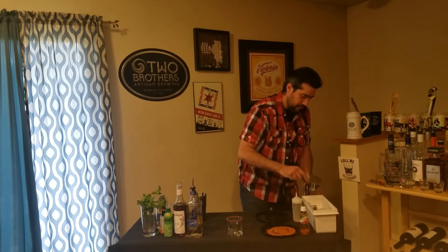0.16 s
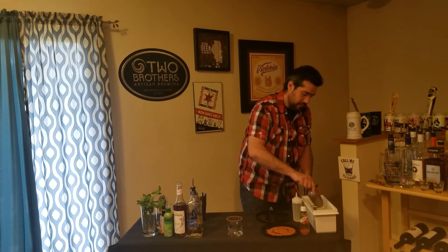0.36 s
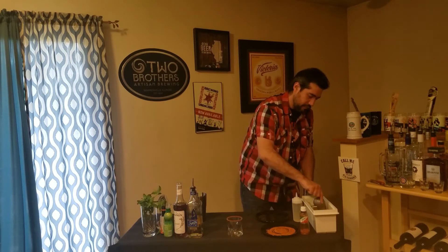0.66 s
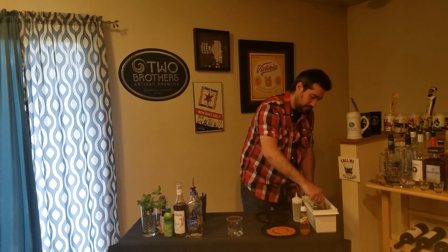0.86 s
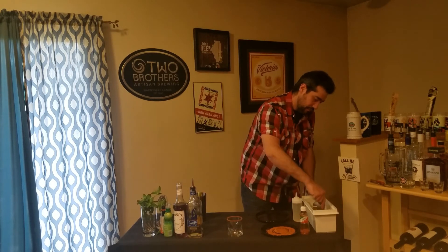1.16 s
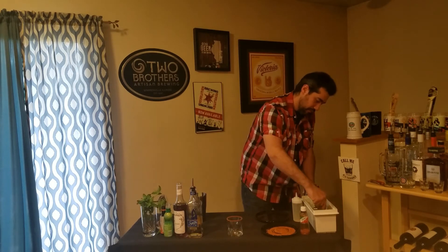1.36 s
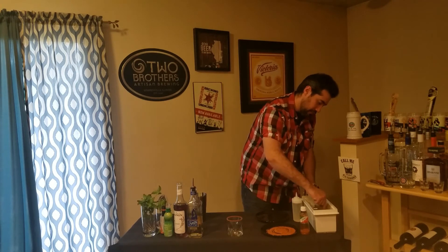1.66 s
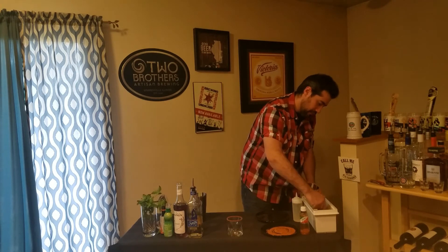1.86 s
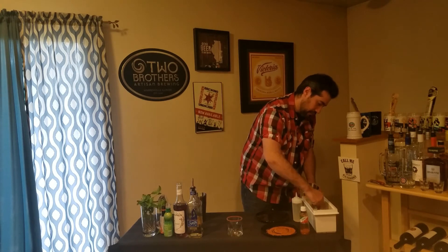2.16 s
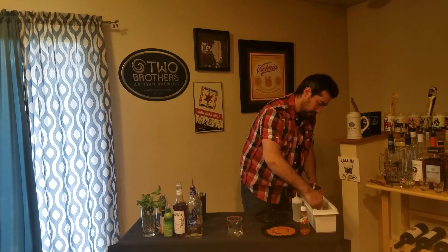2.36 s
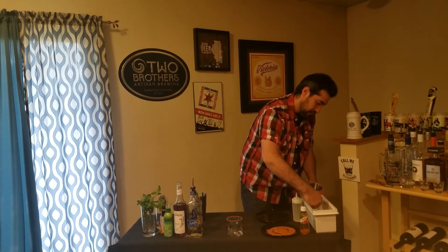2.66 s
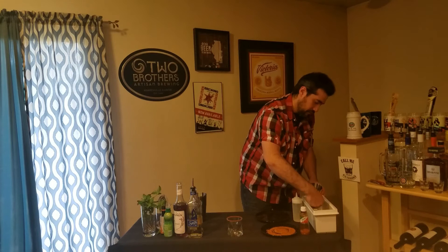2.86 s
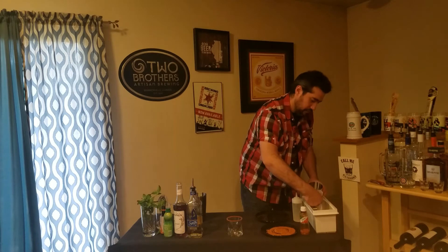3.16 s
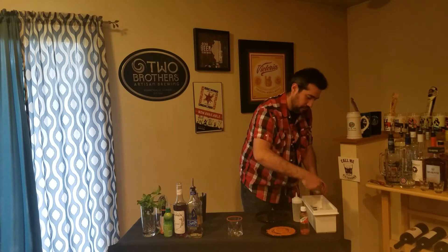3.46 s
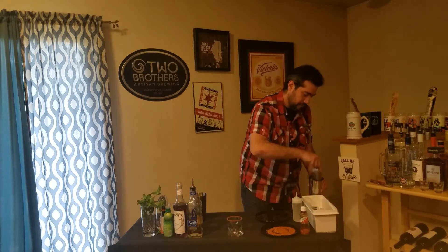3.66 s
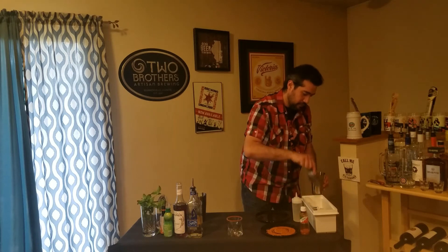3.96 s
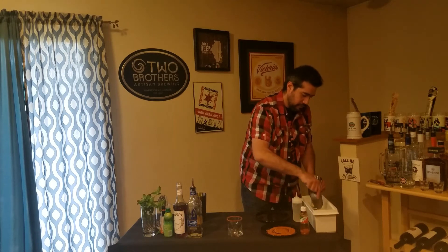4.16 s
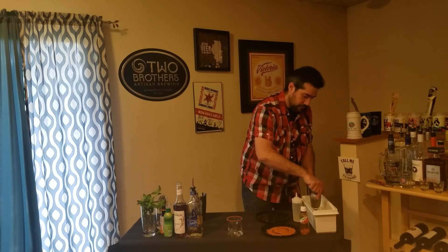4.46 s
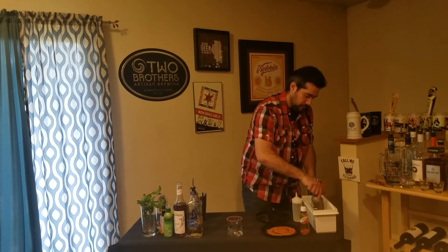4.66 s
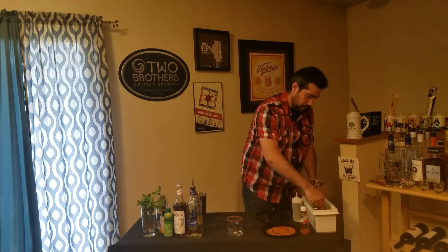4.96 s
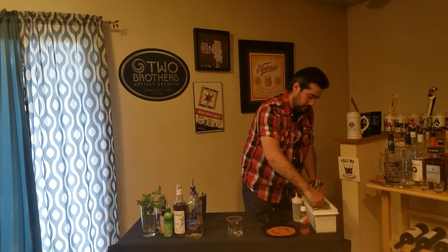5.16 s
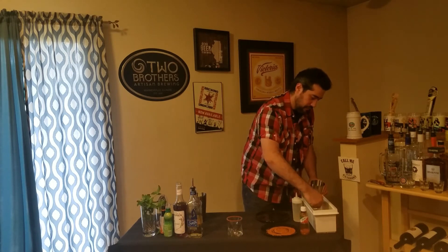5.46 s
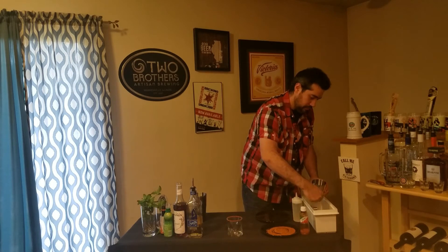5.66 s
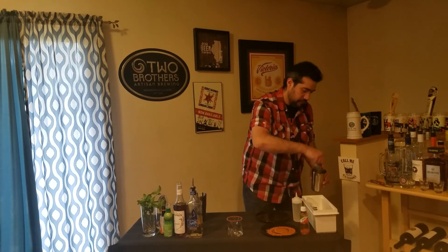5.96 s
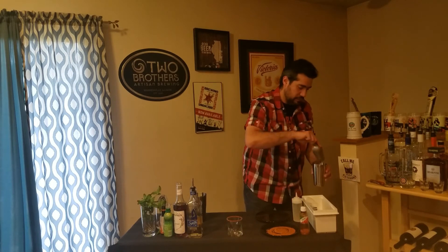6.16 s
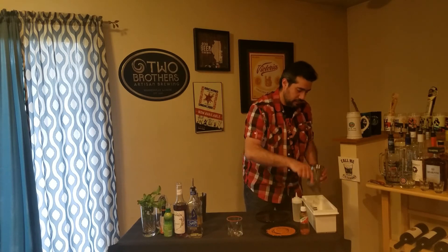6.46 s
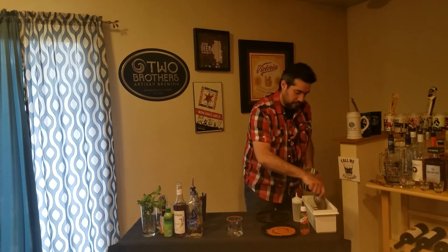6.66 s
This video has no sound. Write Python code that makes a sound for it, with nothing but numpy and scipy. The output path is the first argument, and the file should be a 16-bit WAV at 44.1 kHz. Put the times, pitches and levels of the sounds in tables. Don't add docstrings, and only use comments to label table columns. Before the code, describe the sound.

A quiet fridge hum and soft air run throughout in a small furnished room, heard in stereo from a few metres away. Right at the start an ice cube lands in a steel shaker tin with a bright hollow pop, two quick bounces and a brief ring. From 0.4 to 1.7 seconds tongs dig hard into a plastic bin of ice: dense cracking knocks, low hollow wall thumps and frosty rattle, with strong steel clinks around 1.4. Until 2.3 the cubes keep knocking, then the search thins to faint touches, with a firmer burst near 3.3. At 3.7 a cube drops loudly into the tin, popping, bouncing faintly and ringing. Separate picks and light clinks follow from 4.2 to 5.6, with touches on the tin around 5.5 and 5.9. A softer, duller drop comes at 6.1, and a few knocks and a small clink from 6.55 to 6.8 end it.

```python
import sys
import numpy as np
from scipy import signal
from scipy.fft import rfft, irfft
from scipy.io import wavfile
from scipy.ndimage import uniform_filter1d

SR = 44100
rng = np.random.default_rng(int(sys.argv[2]) if len(sys.argv) > 2 else 0)


def generate_wav(signal):
    frames = np.transpose(np.atleast_2d(signal))
    scaled = np.clip(frames, -1, 1) * 32767
    pcm = np.round(scaled).astype(np.int16)
    wavfile.write(sys.argv[1], SR, pcm)


def field_ratio(decibels):
    return 10 ** (np.asarray(decibels, dtype=float) / 20)


N = 300747

# frequency in Hz, density in dB per Hz.
AIR_SPECTRUM = [(15, 5), (25, -6), (65, -1), (111, 4), (220, 3.5), (422, -3.5), (470, -10.5), (651, -7),
                (706, -6), (952, -10.5), (4020, -18.5), (7710, -27), (8600, -35), (14400, -25.5),
                (16500, -46)]
# frequency in Hz, rms level in dB.
HUM_TONES = [(59.2, -59.5), (118.4, -67.5), (156.1, -59.5), (215.3, -63.5), (236.9, -68.5), (296.1, -66),
             (355.3, -74.5), (414.5, -64.5), (532.9, -76), (710.6, -64), (829.0, -63), (1486, -71),
             (1900, -75.5), (2078, -72), (2611, -79), (3505, -78), (3919, -76), (4651, -76), (6234, -85),
             (14174, -94)]
# frequency in Hz, likeness from 0 to 1.
LIKENESS = [(60, .7), (250, .8), (700, 0.6), (1500, 0.096), (4000, 0.022), (15000, 0.02)]

# start in seconds, blow in dB, wall note in Hz, rim note in Hz, ring in dB.
WALL_CLINKS = [(.008, -29.5, 4700, 13000, -10), (0.031, -19, 6850, 13100, -21),
               (1.359, -8.5, 7120, 12700, 0), (1.446, -13, 7120, 13000, 1), (1.513, -14.5, 6430, 15600, 6),
               (1.556, -46, 6500, 15300, -5), (3.634, -30.5, 6100, 13000, 4),
               (3.663, -24, 6500, 11000, -16), (3.692, -25, 3800, 13200, -5),
               (3.737, -18, 3800, 14200, -18), (4.158, -29.5, 6750, 11870, 2),
               (4.462, -16, 6380, 13000, 1.5), (4.466, -39, 5200, 3870, -12), (5.025, -35, 6150, 12200, -9),
               (5.09, -20, 6230, 12600, 1.5), (5.185, -18.5, 6200, 14700, -14),
               (5.544, -26.5, 6320, 15300, -6), (5.911, -46, 6320, 13700, 9), (5.944, -25, 6030, 13700, -4),
               (6.051, -37.5, 3730, 13300, 0), (6.086, -17.5, 3850, 13800, -2),
               (6.68, -23.5, 7260, 12300, -0.5)]
# start in seconds, blow in dB, hollow note in Hz, upper note in Hz.
BOTTOM_DROPS = [
    (.033, -11.5, 1770, 2300),
    (.052, -16, 1795, 2180),
    (.072, -18.5, 1775, 2050),
    (3.738, -11, 1700, 2860),
    (3.774, -27, 1720, 2730),
    (3.801, -25, 1725, 2780),
    (5.546, -32.5, 2050, 2540),
    (5.944, -34, 2224, 2800),
    (6.088, -18, 1880, 2400),
]
# start in seconds, level in dB, frequency in Hz, t60 in seconds.
TIN_NOTES = [(.033, -25, 1792, .2), (.05, -23, 1781, .36), (.034, -30, 720, .06), (.141, -54, 3920, .25),
             (.106, -29, 1830, .14), (.033, -25, 3035, .075), (.035, -28, 1508, .1), (.035, -29, 2330, .12),
             (3.632, -32, 6230, .23), (3.662, -33, 6200, .19), (3.634, -39, 2450, .13),
             (3.638, -43, 1282, .39), (3.64, -42, 3870, .5), (3.69, -44, 3870, .4), (3.738, -34, 1736, .24),
             (3.738, -30, 2778, .22), (3.738, -35, 3020, .17), (3.737, -48, 3790, .5),
             (4.47, -36, 5200, .12), (4.462, -43, 3890, .3), (4.463, -45, 6325, .45),
             (4.463, -37, 7100, .25), (1.446, -23, 7120, .15), (6.088, -46, 3890, .27),
             (6.087, -27, 1180, .14), (3.735, -19, 2900, .06), (3.738, -29, 2934, .19),
             (3.738, -31, 2670, .17), (4.463, -46, 3128, .2), (5.398, -49, 6150, .3),
             (5.436, -44, 7230, .17), (5.436, -46, 5238, .17), (5.547, -44, 6320, .25),
             (5.912, -48, 6250, .3), (5.945, -46, 3900, .22), (6.088, -33, 2110, .18),
             (6.088, -35, 2326, .17), (6.088, -37, 3919, .14), (6.088, -40, 4242, .17),
             (6.088, -48, 5916, .25)]
# frequency in Hz, level in dB, t60 in seconds.
TIN_MODES = [(2440, -40, 0.14), (3800, 6, 0.22), (5200, -19, 0.11), (5060, -32, 0.078), (6000, -29, 0.19),
             (6320, 8, 0.27), (7120, -47, 0.18), (7800, -32, 0.051)]

# start in seconds,
# blow in dB, sharpness in dB, wall patch in Hz.
ICE_KNOCKS = [(.412, -11, -9.5, 804), (.470, -20, -7.5, 796), (.503, -17.5, -8, 700),
              (.548, -19.5, 0, 630), (.566, -11, -7, 650), (.607, -13, -4.5, 1040),
              (.615, -1.5, -11.5, 1115), (.632, -11.5, -16, 810), (.643, -12, -17, 710),
              (.665, -5.5, -9, 816), (.68, -18.5, -17, 800), (.773, -18.5, -20, 920),
              (.899, -23.5, -37, 820), (.953, -27.5, -18, 665), (.983, -24, -17, 890),
              (1.012, -15.5, -9, 523), (1.08, -22, 0.5, 875), (1.138, -15.5, -12, 710),
              (1.174, -10, -13.5, 663), (1.197, -13, -12.5, 740), (1.251, -28, -31, 690),
              (1.29, -13, -18, 1150), (1.33, -19, -17, 690), (1.362, -13.5, -4.5, 1080),
              (1.368, -17, 0.5, 820), (1.394, -6.5, -14.5, 770), (1.405, -7, -18, 810),
              (1.425, -16, -3.5, 634), (1.462, -9.5, -7, 970), (1.485, -3, -19, 726),
              (1.515, -15.5, -1.5, 790), (1.541, -12.5, -19, 597), (1.563, -10.5, -16, 644),
              (1.582, -19, -9, 630), (1.655, -25.5, -11, 840), (1.673, -24, -10, 830),
              (1.709, -18, -20, 920), (1.738, -25.5, -10.5, 810),
              (1.818, -18.5, -14.5, 557), (1.88, -21, -17, 600), (1.894, -14.5, -17, 846),
                (1.921, -12.5, -18, 570), (1.938, -11, -14, 690), (2.019, -5.5, -18.5, 684),
                (2.036, -11, -17, 615), (2.06, -8.5, -11, 920), (2.077, -21, -18, 810),
                (2.118, -12.5, -14.5, 920), (2.138, -6.5, -15.5, 856), (2.163, -15, -18, 920),
                (2.183, -25, -7.5, 780), (2.216, -19, -15, 570), (2.248, -22.5, -16, 705),
                (2.291, -28.5, -10, 866), (2.317, -15.5, -22, 696), (2.346, -36, -22, 780),
                (2.424, -28, -26, 570), (2.533, -34, -17, 890), (2.671, -32.5, -15, 556),
                (2.725, -34.5, -15, 540), (2.818, -33.5, -13.5, 806), (2.84, -31, -12, 1110),
                (2.879, -17.5, -19.5, 548), (2.985, -32.5, -27, 527), (3.052, -17.5, -6, 643),
                (3.145, -29, -9, 633), (3.203, -29, -17, 860), (3.269, -11, -12, 910),
                (3.302, -10.5, -14, 950), (3.326, -15.5, -4.5, 980), (3.346, -8, -26, 853),
                (3.36, -23.5, -17, 860), (3.388, -29, -7, 860), (3.631, -43.5, 2.5, 1180),
                (3.666, -35.5, -7, 1250), (3.691, -29.5, -5.5, 930), (3.739, -32, 7, 1550),
              (4.162, -23, -10, 1030), (4.186, -17.5, -9.5, 807), (4.212, -22, -13, 730),
               (4.402, -25.5, -27, 680), (4.408, -15.5, -15.5, 667), (4.443, -38, -25, 850),
               (4.464, -21.5, -12, 556), (4.694, -13.5, -11, 708), (4.713, -10.5, -14.5, 613),
               (4.733, -27, -18, 675), (4.752, -22, -10, 755), (5.031, -28.5, -11, 740),
               (5.049, -16, -7, 755), (5.079, -7.5, -15, 595), (5.185, -11, -9.5, 660),
               (5.222, -16, -25, 600), (5.266, -13.5, -21, 670), (5.316, -34, -8, 820),
               (5.357, -13.5, -11, 670), (5.398, -27.5, 0.5, 645), (5.436, -25, -12, 810),
               (5.461, -21.5, -13, 574), (5.547, -34, -3, 880), (5.913, -40, -2.5, 1120),
               (5.943, -39.5, -3.5, 704), (6.05, -33.5, -5.5, 1400), (6.086, -29, 2, 1090),
               (6.554, -21, -11.5, 766), (6.558, -12, -12, 624), (6.63, -38, -3, 630),
               (6.685, -15.5, -13.5, 910), (6.702, -16, -8, 645), (6.783, -28.5, -5.5, 730)]
# start, strongest point and end in seconds, effort in dB.
TONG_STROKES = [(0.41, 0.632, 0.57, -18.5), (0.83, 1.167, 1.31, -27), (1.238, 1.472, 1.48, -16.5),
                (1.846, 2.11, 2.2, -23), (2.3, 2.437, 2.58, -40.5), (2.935, 3.127, 2.85, -29),
                (3.265, 3.336, 3.48, -31.5), (3.55, 3.7, 9.1, -51.5), (4.15, 4.21, 4.25, -36),
                (4.67, 4.836, 4.9, -47), (5.107, 5.272, 5.33, -39), (5.357, 5.437, 5.6, -44),
                (5.996, 6.111, 12, -63.5), (6.538, 6.604, 5.5, -42), (6.67, 6.724, 5.8, -42)]
# time in seconds, level in dB.
FLOOR_WEIGHT = [(0, -6), (.45, 1), (.7, -12.5), (1.1, 1.5), (1.45, -10.5), (1.8, -5.5), (2.05, -10),
                (2.3, -12), (2.9, -4), (3.1, 5), (3.35, -10.5), (4.2, -0.5), (4.45, -9), (4.75, -6),
                (5.1, -3.5), (5.4, -8.5), (6.1, -4), (6.7, -1.5)]
# frequency in Hz, level in dB, t60 in seconds.
BIN_MODES = [(555.4, -3.5, 0.097), (645.5, 0.5, 0.076), (748, -6, 0.067), (780, -4.5, 0.079),
             (860, 1, 0.045), (903, -1, 0.077), (994, -23, 0.027), (1082, -9, 0.11), (1167, -9.5, 0.053),
             (1527, -2, 0.036)]

# frequency in Hz, density in dB per Hz.
CLICK_SPECTRUM = [(600, -13), (1000, -4.5), (1300, 3), (1730, 5), (2640, -0.5), (3400, -13), (6500, -22),
                  (11000, -77.5)]
# frequency in Hz, density in dB per Hz.
CRACK_SPECTRUM = [(2350, -3), (4000, 1.5), (4890, -3), (7410, -2), (7910, -5), (8540, -11), (9620, -16),
                  (11000, -12), (13000, -10.5), (15500, -7)]
# frequency in Hz, density in dB per Hz.
THUD_SPECTRUM = [(80, -41), (180, -5.5), (350, 6.5), (600, 1.5), (950, 5.5), (1300, 3), (2000, -33.5)]

# frequency in Hz, gain in dB.
ICE_TONE = [(250, 0), (400, -2), (500, 0.5), (620, 1.5), (800, 1.5), (1050, -1), (2000, -2), (2800, 1)]
# delay in milliseconds, level in dB.
ECHOES = [(2.3, -2), (3.7, -14), (5.9, -5), (8.8, -6), (12.1, -7), (15.6, -13), (20.5, -10), (26., -13)]
# frequency in Hz, t60 in seconds.
ROOM_T60 = [(200, 0.5), (600, 0.27), (1500, 0.33), (4000, 0.36), (8000, 0.3), (15000, 0.26)]
# frequency in Hz, left minus right in dB.
LEFT_MINUS_RIGHT = [(100, 1.5), (1500, 1.5), (2500, -0.6), (14000, -0.5)]

AIR_DB = -52
UPPER_DB, RIM_DB = -8.5, -2.5
LASTING_DB, DAMPED_DB_PER_S = -34, -4.5
CRACK_UNDER_DB, CRACK_SCATTER_DB = -12, -2
SPREAD_MS, SPREAD_SCATTER_MS = 4.68, 0.97
CRACK_LEAD_S = 0.002945
STROKE_ENDS_DB = -17.5
GRIND_SLOPE, GRIND_PIVOT_DB = 0.82, -28
LEFT_LAG_SAMPLES, EDGE_HZ = 4, 16000


def evened(x):
    return x / np.sqrt(np.mean(x ** 2) + 1e-20)


def peaked(x):
    return x / abs(x).max()


def read(points, hz):
    f, value = np.transpose(points)
    return np.interp(np.log(hz + 1), np.log(f + 1), value)


def add(mix, start_s, sound):
    part = mix[round(start_s * SR):][:len(sound)]
    part += sound[:len(part)]


def causal(points, size=1024):
    hz = abs(np.fft.fftfreq(4 * size, 1 / SR))
    log_gain = np.log(field_ratio(read(points, hz)))
    return np.fft.ifft(np.exp(np.conj(signal.hilbert(log_gain)))).real[:size]


def diffuse(db_field, hz):
    a, b, c, d = rng.standard_normal((db_field.shape[1], len(hz), 4)).T
    same = np.clip(read(LIKENESS, hz), -1, 1)[:, None]
    left = a + 1j * b
    right = same * left + np.sqrt(1 - same ** 2) * (c + 1j * d)
    size = 2 * len(hz) - 2
    z = np.array([left, right]) * field_ratio(db_field)
    return evened(signal.istft(z, nperseg=size, noverlap=size * 3 // 4)[1])


def fridge():
    hz, t = np.fft.rfftfreq(2048, 1 / SR), np.arange(N) / SR
    air = diffuse(read(AIR_SPECTRUM, hz)[:, None] + np.zeros(N // 512 + 5), hz)[:, :N]
    hum = np.zeros((2, N))
    for tone_hz, db in HUM_TONES:
        waver_hz = rng.uniform(0.55, 1.74)
        waver_db = 0.53 * np.sin(2 * np.pi * (waver_hz * t + rng.random()))
        phase = 2 * np.pi * rng.random() + np.array([[0], [0.5 * rng.standard_normal()]])
        hum += np.sqrt(2) * field_ratio(db + waver_db) * np.sin(2 * np.pi * tone_hz * t + phase)
    return field_ratio(AIR_DB) * air + hum


def rings(modes, luck, shorter=0.19, rise_ms=0.62, size=6000):
    hz, db, t60_s = np.transpose(modes)[:, :, None]
    t, luck = np.arange(size) / SR, luck[:len(modes), None]
    decay = field_ratio(db + luck - 60 * t / (shorter * t60_s))
    sines = decay * np.sin(2 * np.pi * hz * t + 10 * luck)
    return peaked(sines.sum(0) * (1 - np.exp(-1000 * t / rise_ms)))


def contact(fall_ms, chance, rise_ms=0.1):
    t_ms = np.arange(len(chance)) * 1000 / SR
    return chance * abs(chance) * np.exp(-t_ms / fall_ms) * (1 - np.exp(-(t_ms + 0.65) / rise_ms))


def clink(hz, rim_hz, ring_db, chance, crack):
    sound = field_ratio(-21) * rings(TIN_MODES, 2.24 * chance, 0.62)
    sound += field_ratio(ring_db - 7) * rings([(hz, 0, .05), (hz * 1.015, -4, .035)], chance)
    rim = [(rim_hz, 0, .025), (rim_hz * 1.01, -4, .02)]
    sound += field_ratio(ring_db + RIM_DB - 8) * rings(rim, chance)
    snap = peaked(signal.fftconvolve(contact(41.0, chance), crack))
    sound[:len(snap)] += snap
    return sound


def pop(start_s, hz, upper_hz, chance, push):
    short = [(hz, 0, .022), (hz * .92, -8, .014), (hz * 1.14, -8, .014), (upper_hz, UPPER_DB, .022)]
    ring_db = LASTING_DB + DAMPED_DB_PER_S * start_s
    lasting = [(hz, ring_db, .36), (hz * 1.025, ring_db - 3, .14), (upper_hz, ring_db + UPPER_DB, .08)]
    sound = rings(short + lasting, chance, shorter=1.0, rise_ms=4.0, size=14000)
    knocked = signal.fftconvolve(contact(0.2, chance), push)
    sound[:len(knocked)] += field_ratio(-11.0) * peaked(knocked)
    return sound


def tin():
    out, crack = np.zeros(N), causal(CRACK_SPECTRUM)
    push = peaked(causal(CLICK_SPECTRUM)) + field_ratio(4.0) * peaked(causal(THUD_SPECTRUM))
    chances = rng.standard_normal((len(WALL_CLINKS), 900))
    for (s, db, hz, rim_hz, ring_db), chance in zip(WALL_CLINKS, chances):
        add(out, s, field_ratio(db) * clink(hz, rim_hz, ring_db, chance, crack))
    chances = rng.standard_normal((len(BOTTOM_DROPS), 300))
    for (s, db, hz, upper_hz), chance in zip(BOTTOM_DROPS, chances):
        add(out, s, field_ratio(db + 0.5) * pop(s, hz, upper_hz, chance, push))
    return out


def singing():
    out, t = np.zeros(N), np.arange(16000) / SR
    for s, db, hz, t60_s in TIN_NOTES:
        beat_hz = 14 + 12 * rng.random()
        beat = 1 + 0.25 * np.sin(2 * np.pi * beat_hz * t)
        envelope = field_ratio(db - 60 * t / t60_s) * (1 - np.exp(-t / 0.0032))
        add(out, s, envelope * beat * np.sin(2 * np.pi * (hz * t + rng.random())))
    return out


def knock(db, click_db, crack_db, hz, ms, chance, pulses, weight_db=-9.5):
    pushes = contact(ms * 0.56, chance, 0.66), contact(ms * 0.54, chance[::-1], 2.0), contact(ms * 1.41, chance, 0.47)
    thud, click, crack = (peaked(signal.fftconvolve(push, p)) for push, p in zip(pushes, pulses))
    walls = rings(BIN_MODES + [(hz, 6, .05)], 2.6 * chance[:20], 0.41, ms * 0.3, size=3000)
    out = np.zeros(3400)
    add(out, 0, field_ratio(crack_db + 16.0) * crack)
    add(out, CRACK_LEAD_S / 2, field_ratio(click_db + 13.0) * click)
    add(out, CRACK_LEAD_S, field_ratio(weight_db) * thud)
    add(out, CRACK_LEAD_S, field_ratio(-1.0) * walls)
    return field_ratio(db) * out


def clear_knocks(pulses):
    out, knocks = np.zeros(N), ICE_KNOCKS
    for (s, db, sharp_db, hz), chance in zip(knocks, rng.standard_normal((len(knocks), 1500))):
        crack_db = sharp_db + CRACK_UNDER_DB + CRACK_SCATTER_DB * chance[-1]
        ms = np.clip(SPREAD_MS + SPREAD_SCATTER_MS * chance[-2], 2, 7.5)
        weight_db = np.interp(s, *np.transpose(FLOOR_WEIGHT))
        sound = knock(db, sharp_db, crack_db, hz, ms, chance, pulses, weight_db)
        add(out, s - 0.004, field_ratio(-2.5) * sound)
    return out


def stroke(start, top, end, db):
    t = np.arange(start, end, 1 / SR)
    return db + np.interp(t, [start, top, end], [STROKE_ENDS_DB, 0, STROKE_ENDS_DB])


def stirring(pulses):
    rattle_gain, grind_gain, rattle = np.zeros((3, N))
    for row in TONG_STROKES:
        effort_db = stroke(*row)
        add(rattle_gain, row[0], field_ratio(effort_db))
        add(grind_gain, row[0], field_ratio(-37 + GRIND_SLOPE * (effort_db - GRIND_PIVOT_DB)))
    sizes = field_ratio(5.5 * np.minimum(rng.exponential(1, N), 3.2))
    for chance in rng.standard_normal((5, 1500)):
        taps = sizes * (rng.random(N) < 55 / SR)
        tap = knock(0, -10.5, -22, 780 * field_ratio(chance[30]), 1.85, chance, pulses)
        rattle += signal.oaconvolve(taps, tap)[:N]
    rattle = signal.sosfilt(signal.butter(2, 400, "high", fs=SR, output="sos"), rattle)
    grit = sizes * rng.standard_normal(N) * (rng.random(N) < 900 / SR)
    grind = signal.oaconvolve(grit, pulses[2])[:N]
    return field_ratio(-8.5) * rattle_gain * evened(rattle) + field_ratio(-21.0) * grind_gain * evened(grind)


def bin_of_ice():
    pulses = [causal(p) for p in (THUD_SPECTRUM, CLICK_SPECTRUM, CRACK_SPECTRUM)]
    return clear_knocks(pulses) + stirring(pulses)


def room(x, tail_db=1.5):
    hz, t = np.fft.rfftfreq(256, 1 / SR), np.arange(320) * 64 / SR
    out = np.zeros((2, N))
    for ms, db in ECHOES:
        echo = rng.choice([-1., 1.]) * field_ratio(db) * x
        apart_ms = rng.uniform(-0.11, 0.11)
        add(out[0], (ms + apart_ms) / 1000, echo)
        add(out[1], (ms - apart_ms) / 1000, echo)
    for k in range(3):
        tail = diffuse(-60 * t / read(ROOM_T60, hz)[:, None], hz)
        z = rfft(tail * (1 - np.exp(-np.arange(tail.shape[1]) / SR / 0.018)))
        z /= np.sqrt(uniform_filter1d(abs(z) ** 2, size=30).mean(0))
        tail = irfft(z)
        tail /= np.linalg.norm(tail[0])
        turn = np.sqrt(2 / 3) * np.cos(2 * np.pi * (1.3 * np.arange(N) / SR + k / 3))
        out += field_ratio(tail_db) * signal.oaconvolve((x * turn)[None], tail, axes=1)[:, :N]
    return out


def scene():
    cut = signal.butter(3, 190, "high", fs=SR, output="sos")
    ice = signal.oaconvolve(signal.sosfilt(cut, bin_of_ice()), causal(ICE_TONE))[:N]
    steel = signal.sosfilt(cut, tin())
    notes = singing()
    direct = field_ratio(-2.5) * ice + field_ratio(2.5) * (steel + notes)
    reflected = room(ice + field_ratio(-3.0) * steel + field_ratio(-7.5) * notes)
    return field_ratio(-2.0) * (direct + reflected) + fridge()


def low_pass(x):
    return signal.sosfilt(signal.butter(12, 16980, fs=SR, output="sos"), x)


def record(dry):
    hz = np.fft.rfftfreq(N + 64, 1 / SR)
    side = field_ratio(read(LEFT_MINUS_RIGHT, hz) / 2)
    lag = np.exp(-2j * np.pi * hz * LEFT_LAG_SAMPLES / SR)
    ears = np.array([side * lag, 1 / side]) * (hz < EDGE_HZ)
    mix = irfft(rfft(dry, N + 64) * ears, N + 64)[:, :N]
    return low_pass(mix)


dry = scene()
out = record(dry)
generate_wav(out)
```